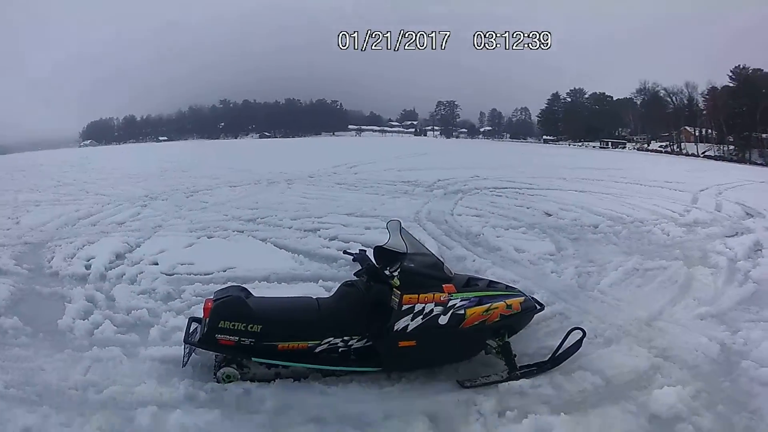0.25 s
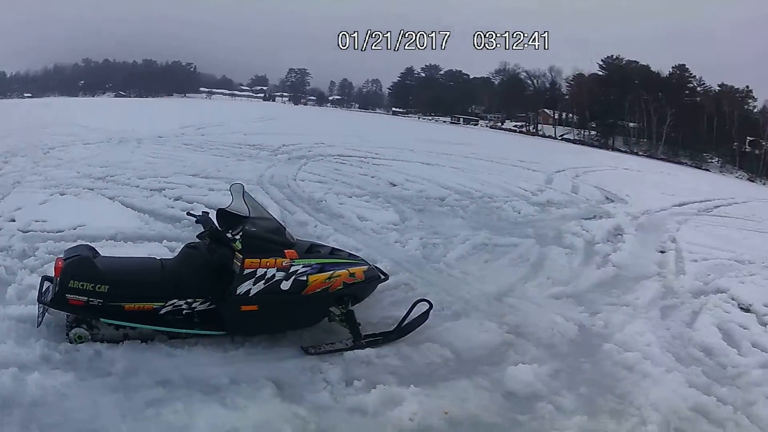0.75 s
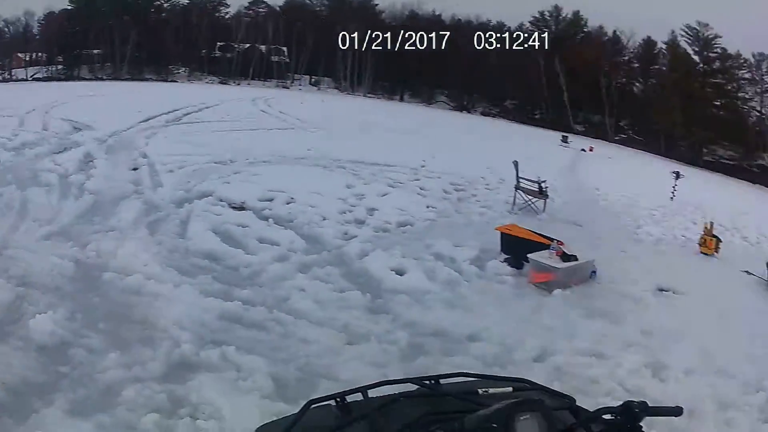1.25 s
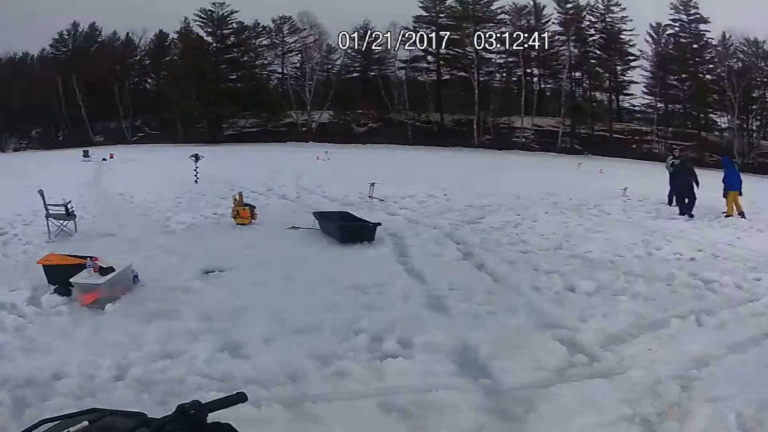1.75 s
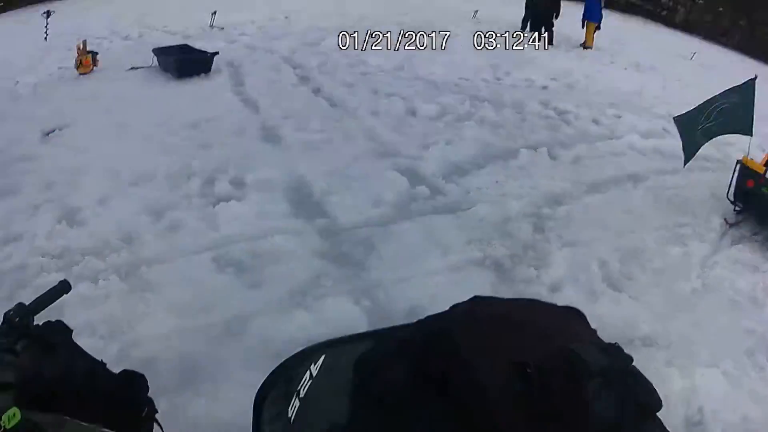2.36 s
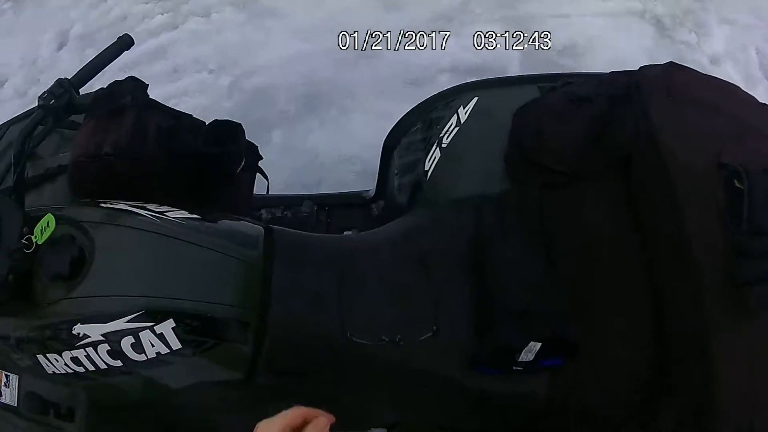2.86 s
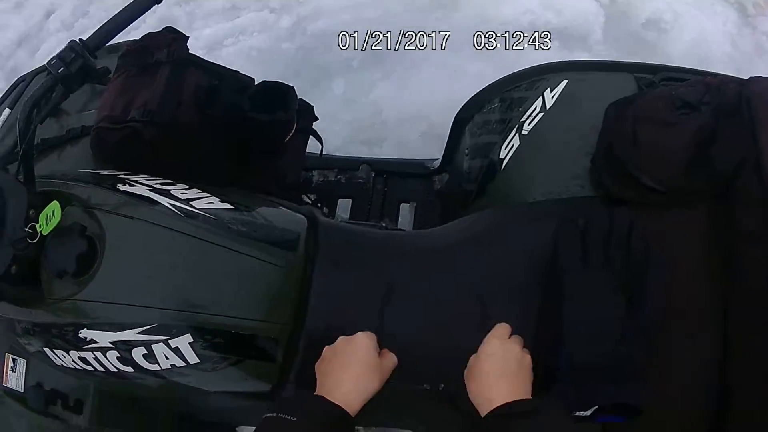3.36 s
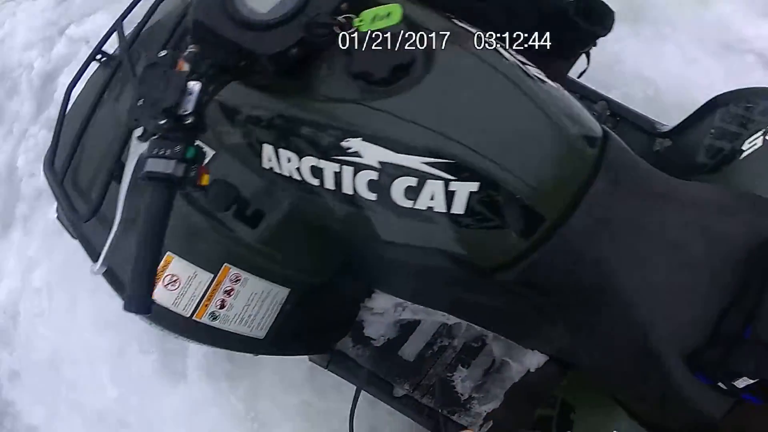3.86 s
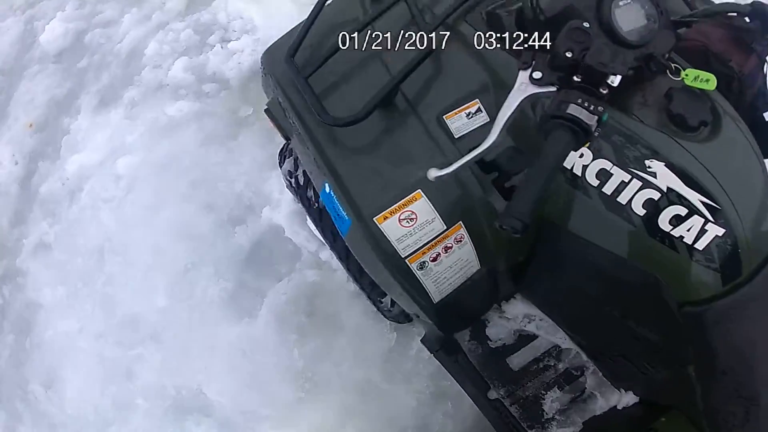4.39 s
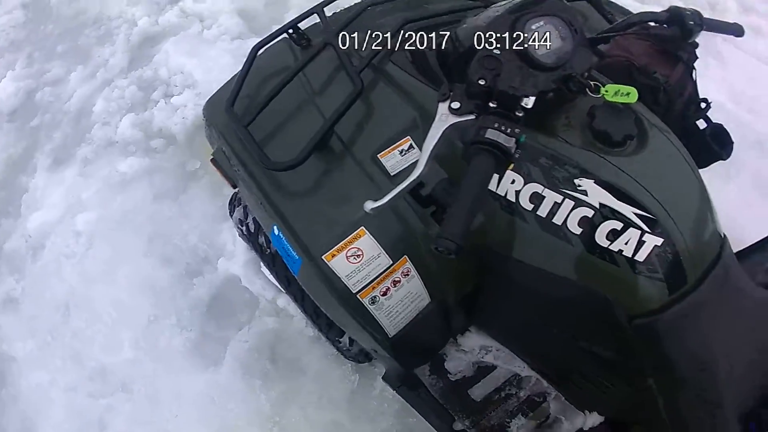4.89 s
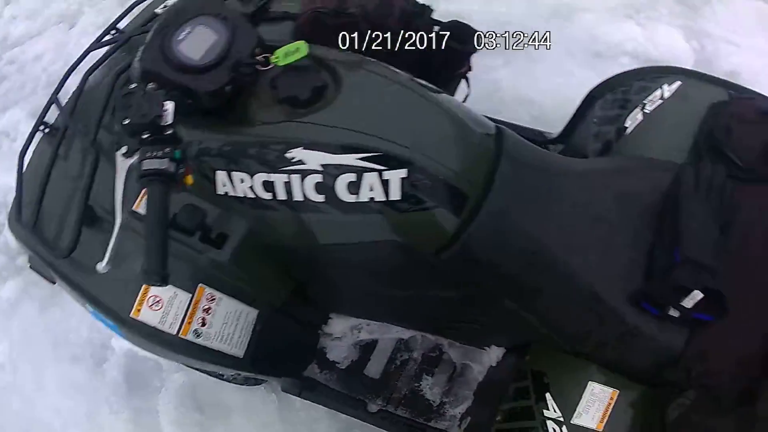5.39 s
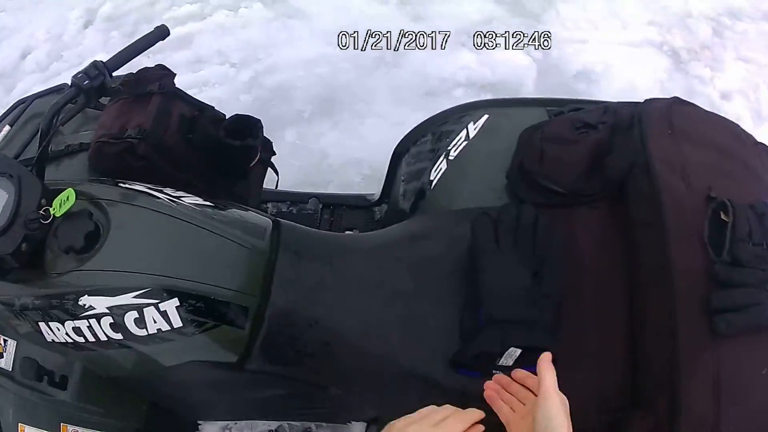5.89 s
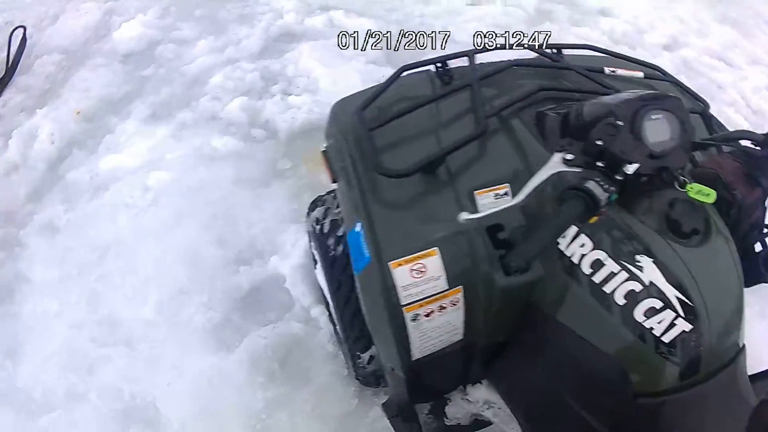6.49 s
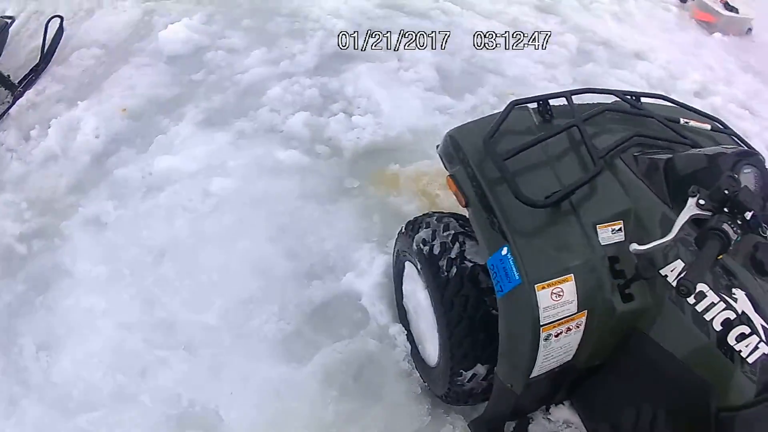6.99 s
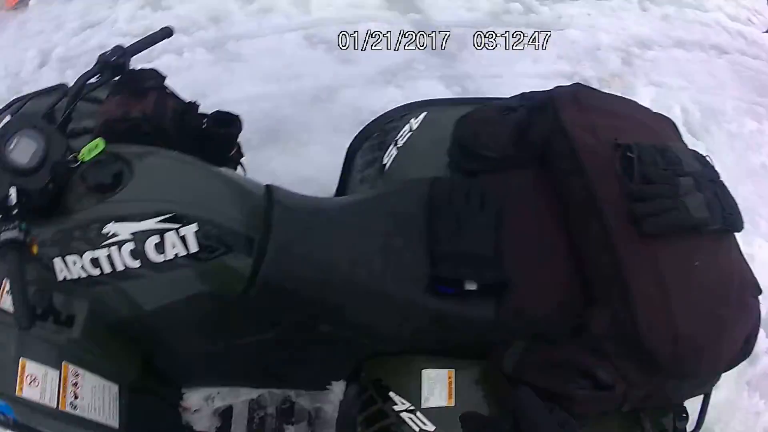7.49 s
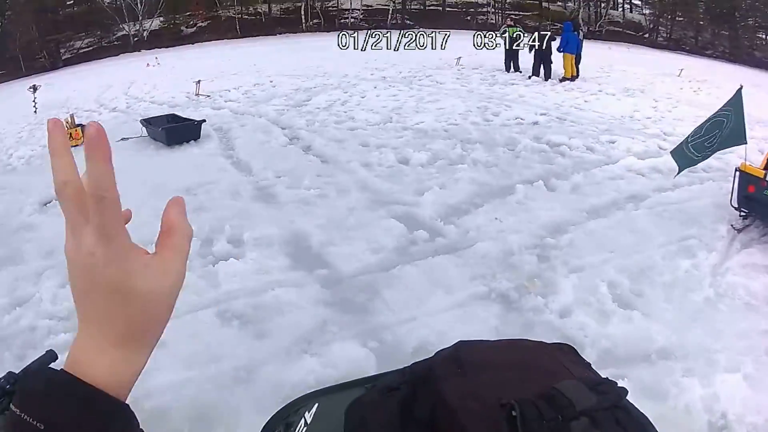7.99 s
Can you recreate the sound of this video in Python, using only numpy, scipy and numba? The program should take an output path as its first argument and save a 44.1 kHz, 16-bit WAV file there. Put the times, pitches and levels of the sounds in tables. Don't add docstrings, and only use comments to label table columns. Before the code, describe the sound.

A small two-stroke engine idles close by on open lake ice. Its firing is ragged: dull hollow exhaust bangs and sharp piston raps skip along over constant rattle and a wavering hum. The microphone is worn on the body in a sealed case, so the top is muffled. Turning the head makes the rattle brighter or duller, and low thuds of steps and jolts come through the body.

```python
import sys
import numpy as np
from scipy import signal
from scipy.fft import rfft, irfft
from scipy.io import wavfile
from scipy.ndimage import uniform_filter1d
from numba import njit

SR = 44100
rng = np.random.default_rng(int(sys.argv[2]) if len(sys.argv) > 2 else 0)


def ratio_of_db(decibels):
    return 10 ** (np.asarray(decibels, float) / 20)


def pcm_store(signal):
    levels = np.round(np.clip(np.atleast_2d(signal), -1, 1) * 32767)
    wavfile.write(sys.argv[1], SR, levels.astype(np.int16).T)


N = 363825
TIME = np.arange(N) / SR
CRANK_HZ = 46.5
BANG_LEAD_TURNS = 0.14


def level(x, db):
    return x * ratio_of_db(db) / np.sqrt(np.mean(x ** 2))


@njit
def svf(x, hz, width):
    y, band, low = np.empty(len(x)), 0., 0.
    for i in range(len(x)):
        g, k = np.tan(np.pi * hz[i] / SR), width / hz[i]
        v = (band + g * (x[i] - low)) / (1 + g * (g + k))
        band, low, y[i] = 2 * v - band, low + 2 * g * v, k * v
    return y


def ring(x, hz, width):
    hz = hz + np.zeros(N)
    once = svf(x + 1e-18, hz, 1. * width)
    return svf(once, hz, 1. * width)


def body(x, modes):
    return sum((-1) ** k * ratio_of_db(db) * ring(x, hz, w) for k, (hz, w, db) in enumerate(modes))


def coloured(points):
    hz, db = np.transpose(points)
    log_f = np.log(np.arange(N // 2 + 1) * SR / N + 1)
    gain = ratio_of_db(np.interp(log_f, np.log(hz), db, left=-70, right=-90))
    return level(irfft(rfft(rng.standard_normal(N)) * gain, N), 0)


def walk(rate):
    k = int(SR / rate)
    held = np.repeat(rng.standard_normal(N // k + 1), k)
    return 1.5 * uniform_filter1d(uniform_filter1d(held, k), k)[:N]


def clicks(s, db):
    x = np.zeros(N)
    np.add.at(x, np.clip(s * SR, 0, N - 1).astype(int), ratio_of_db(db))
    return x


def puffs(s, db, rise, fall):
    t = np.arange(SR // 8) / SR
    shape = (1 - np.exp(-t / rise)) * np.exp(-t / fall)
    return signal.fftconvolve(clicks(s, db), shape / shape.max())[:N]


def turbulent(x, span=0.013):
    power = uniform_filter1d(x ** 2, int(span * SR))
    return x / np.sqrt(power + 0.0077 * np.mean(x ** 2))


def spit(gas):
    return turbulent(ring(gas, 4700, 180) + ratio_of_db(-4.5) * ring(gas, 4000, 570))


# (f/Hz, level/dB per Hz)
RUMBLE_COLOUR = [(15, 2.5), (30, -2), (62, -4.5), (76, -2.5), (102, 4.5), (130, -4), (200, -11), (280, -15),
                 (400, -39)]


def rumble():
    return level(coloured(RUMBLE_COLOUR) * ratio_of_db(0.5 * walk(1.4)), -71.0)


# (t/s, peak level/dB, f/Hz, time to fade by 60 dB/s)
BODY_THUDS = [(0.06, -50.5, 60.5, 0.97), (0.251, -43.5, 63.6, 0.68), (0.729, -51.5, 64.4, 0.46),
              (1.239, -42, 63.7, 0.47), (1.403, -45.5, 60.5, 0.28), (1.638, -51, 60.6, 0.84),
              (1.78, -55, 61, 0.15), (1.93, -51, 32.5, 0.21), (2.1, -54, 57.3, 0.83),
              (2.361, -57, 57, 0.54), (3.551, -51.5, 45, 0.29), (4.954, -43.5, 54.5, 0.34),
              (5.007, -37, 62, 0.37), (5.281, -55, 70, 0.5), (6.55, -53, 40.3, 0.3), (7.45, -59, 31, 0.25)]


def thuds():
    out = np.zeros(N)
    wobble, sway = ratio_of_db(1.3 * walk(22)), 0.5 * walk(24)
    knock = ring(ring(rng.standard_normal(N), 140, 180), 140, 260)
    knock = turbulent(knock, 0.045)
    for s, db, hz, t60 in BODY_THUDS:
        t = np.maximum(TIME - s, 0)
        fade = np.exp(-np.log(1000) * t / t60) * (1 - np.exp(-t / 0.012))
        tap_fade = np.exp(-t / 0.023) * (1 - np.exp(-t / 0.0052))
        tap = ratio_of_db(-14 + 0.4 * (db + 41.5)) * knock * tap_fade
        out += ratio_of_db(db) * (fade * np.sin(2 * np.pi * hz * t + sway) + tap)
    return out * wobble


def crank():
    s = np.array(PISTON_RAPS)[:, 0]
    turns = np.cumsum(np.round(np.diff(s, prepend=s[0]) * CRANK_HZ))
    lead = np.interp(TIME, s, turns - CRANK_HZ * s)
    return CRANK_HZ * TIME + uniform_filter1d(lead, SR // 5, mode="nearest")


def lit(marks, turns, lead=0):
    s, db, count, trait = np.transpose(marks)
    at = np.round(np.interp(s, TIME, turns) + lead)
    charge = np.cumsum(count) - count
    each = np.arange(charge[-1] + 1)
    turn = np.round(np.interp(each, charge, at) + 1e-6)
    between = ~np.isin(each, charge)
    when = np.where(between, np.interp(turn - lead, turns, TIME), np.interp(each, charge, s))
    each_trait = np.repeat(trait, count.astype(int))[:len(each)]
    return when, np.interp(each, charge, db), each_trait, between


def shaking(turns):
    rap_s = lit(PISTON_RAPS, turns)[0]
    bang_s = lit(EXHAUST_BANGS, turns, BANG_LEAD_TURNS)[0]
    jolts = puffs(rap_s, 0, 0.00063, 0.0049)
    jolts = jolts + 0.16 * puffs(bang_s - 0.012, 0, 0.00048, 0.065)
    stir = 0.33 + jolts
    return stir / np.mean(stir)


# (multiple of the crank rate, rms level/dB)
PUMP_TONES = [(3, -82), (4, -90), (5, -92), (6, -82), (9, -75), (10, -69), (11, -64), (12, -65), (13, -63),
              (15, -70), (16, -71), (17, -66), (18, -72), (19, -65), (24, -72)]


def pumping(turns, lower_db):
    tones = np.zeros(N)
    for k, db in PUMP_TONES:
        strength = ratio_of_db(db + 1.5 * walk(10))
        angle = 2 * np.pi * k * (turns + 0.37 * (k > 14))
        tones += strength * np.cos(angle + 0.3 * walk(6))
    return tones * ratio_of_db(3.0 + 0.058 * (lower_db + 53.0))


# (f/Hz, width/Hz, level/dB)
BLAST_RINGS = [
    (1213, 64, -3),
    (1711, 60, -4),
    (1970, 350, -18),
    (2890, 290, -16.5),
    (3690, 97, -28.5),
    (4130, 100, -31),
]


def pipe_blast(gas, tip_db, count=6):
    return body(gas, BLAST_RINGS[:count]) + ratio_of_db(tip_db) * ring(gas, 1507, 91)


# (f/Hz, level/dB per Hz)
CLATTER_COLOUR = [(240, -38.5), (400, -9), (480, -8.5), (590, -7), (650, -13), (880, -5.5), (1040, -17.5),
                  (1230, -12.5), (1900, -15.5), (2540, -21), (2850, -17.5), (3700, -31.5), (4800, -42.5),
                  (5800, -47.5)]


def clatter(turns, hz, treble_db, upper_db, lower_db, tip_db):
    throb = np.sqrt(shaking(turns)) * ratio_of_db(0.27 * np.cos(4 * np.pi * turns) + 0.52 * walk(25))
    noise = rfft(coloured(CLATTER_COLOUR) * throb)
    f = np.arange(len(noise)) * SR / N
    edges = ((0, 1040), (1040, 2540), (2540, SR))
    low, mid, top = (level(irfft(noise * ((f >= a) & (f < b)), N), 0) for a, b in edges)
    gas = rng.standard_normal((2, N))
    upper = level(pipe_blast(gas[0], tip_db, 2) * throb, 0)
    ear = level(ring(gas[1], hz, 180) * throb ** 1.1, 0)
    heard = ratio_of_db(lower_db - 4.0) * low
    heard = heard + ratio_of_db(upper_db) * (upper + 1.13 * mid)
    heard = heard + ratio_of_db(treble_db - 6.5) * ear
    return heard + ratio_of_db(-64.5 + 0.067 * (treble_db + 55.0)) * top


# (t/s, peak level/dB, lit charges until the next row, level those fall short or over/dB)
PISTON_RAPS = [(0.0364, -43.1, 3, 1), (0.2328, -42.4, 2, 2), (0.3195, -43.0, 1, 0), (0.4947, -44.2, 4, 2),
               (0.8216, -40.6, 3, 0), (0.9965, -35.9, 3, 0), (1.2572, -33.4, 9, -6), (1.8166, -34.0, 6, -1),
               (2.2937, -36.3, 3, -5), (2.838, -40.6, 3, 2), (2.9677, -43.9, 5, 2), (3.3989, -41.4, 6, 0),
               (3.7633, -32.9, 6, -3), (4.2563, -32.4, 2, -5), (4.3413, -34.1, 2, 2),
               (4.4696, -33.1, 3, -1), (4.7053, -31.9, 3, -2), (4.8344, -33.1, 2, -8),
               (5.1807, -32.5, 2, 4), (5.3108, -37.7, 4, 1), (5.7648, -44.5, 6, 3), (6.2149, -34.9, 2, 0),
               (6.3412, -32.9, 5, -2), (6.7242, -36.1, 3, 1), (6.9788, -33.9, 1, 0), (7.0843, -34.8, 4, -2),
               (7.2552, -31.3, 2, -3), (7.383, -38.4, 2, -2), (7.5525, -42.8, 8, 0), (8.1243, -32.6, 1, 0)]


def raps(turns, hz, treble_db, tip_db):
    s, db, short_db, between = lit(PISTON_RAPS, turns)
    chance = rng.standard_normal((len(s), 2)).T
    db = db + between * (short_db + 1.2 * chance[0])
    after_db = -8 + 1.5 * chance[1]

    whole = np.flatnonzero(np.diff(np.floor(turns))) / SR
    soft_db = np.interp(whole, TIME, treble_db) + 5 + 2.8 * rng.standard_normal(len(whole))
    soft_db = soft_db + 10 * np.log10(np.interp(whole - 0.004, TIME, shaking(turns)))
    far = np.abs(whole[:, None] - s).min(axis=1) > 0.006

    lag, width = 0.0026, 200
    kick = clicks(s - lag, db + 1) + clicks(whole[far] - lag, soft_db[far])
    kick = kick * SR * np.e / (2 * np.pi * width)
    kick = ring(kick, hz, 1200)
    twin = ratio_of_db(-11 + 0.05 * (hz - 2100) - 2.2 * (treble_db + 51.5))
    slap = ring(kick, hz, width) + twin * ring(kick, 2380, 150) + ratio_of_db(-16) * ring(kick, 2800, 370)

    gas = rng.standard_normal((3, N))
    hood = turbulent(ring(gas[0], hz, 90) + twin * ring(gas[0], 2380, 140))
    hood = hood + ratio_of_db(-11.5) * level(pipe_blast(gas[1], tip_db), 0)
    echo = puffs(s + 0.006, db + after_db - 5.5, 0.003, 0.012) * hood
    return slap + echo + puffs(s - 0.001, db - 46.5, 0.00065, 0.0024) * spit(gas[2])


# (f/Hz, width/Hz, level/dB)
BARK_RINGS = [
    (516, 210, -12.5),
    (710, 38, 6),
    (778, 38, 0.5),
    (889.5, 16, 0.5),
]
# (t/s, boom level/dB, lit charges until the next row, their bark level over the boom/dB)
EXHAUST_BANGS = [(0.0777, -45.9, 4, -4.7), (0.3822, -50, 1, -3.5), (0.4043, -48.2, 4, -4.0),
                 (0.6886, -48.1, 4, 0.4), (1.0144, -49.6, 5, 2.4), (1.4704, -49.5, 4, 5.2),
                 (1.7703, -51.0, 6, 4.7), (2.2693, -52.2, 3, 1.9), (2.4667, -55.2, 6, 7.4),
                 (2.9639, -55.0, 1, 4.3), (3.0288, -53.4, 5, 5.0), (3.3747, -55.8, 4, 1.5),
                 (3.5458, -53.5, 5, 4.2), (4.0177, -49.7, 4, -2.0), (4.1892, -47.5, 4, -1.2),
                 (4.5094, -48.3, 4, 0.8), (4.724, -47.4, 5, 0.9), (5.134, -48.6, 4, -0.0),
                 (5.394, -52.1, 3, 6.6), (5.632, -56.5, 1, 2.5), (5.6536, -55.4, 2, 8.6),
                 (5.8482, -56.7, 6, 5.6), (6.2329, -48.8, 5, 2.1), (6.6377, -53.1, 2, 3.6),
                 (6.7222, -52.1, 5, 6.5), (7.0605, -55, 4, 6.8), (7.3373, -50.6, 4, 3.5),
                 (7.6757, -51.7, 3, 0.8), (7.8027, -53.1, 5, 4.0), (8.2067, -54.2, 1, 5.8)]


def bangs(turns, hz, lower_db, tip_db):
    s, db, bark_db, between = lit(EXHAUST_BANGS, turns, BANG_LEAD_TURNS)
    chance = rng.standard_normal((len(s), 4)).T
    bark_db = bark_db - 0.1 + 1.5 * chance[1]
    head_db = 1.3 * (np.interp(s, TIME, lower_db) + 52.5)
    blast_db = 3.5 - 1.0 * (db + 52.5) + head_db + 1.5 * chance[2]
    db = db + between * (-0.8 + 1.45 * chance[0])

    order = 8
    swell = uniform_filter1d(puffs(s - 0.012, db + 0.092, 0.023, 0.009), SR // 80)
    swell = swell + ratio_of_db(-65 + 1.4 * (lower_db + 47.5))
    tone = np.cos(2 * np.pi * order * turns + 0.43 * walk(12))
    boom = swell * (tone + ratio_of_db(-10.0) * np.cos(2 * np.pi * (order - 1) * turns))

    gas = rng.standard_normal((3, N))
    blow = clicks(s - 0.009, db + bark_db + 22.5) + clicks(s - 0.002, db + bark_db + 24.0)
    open_side = ratio_of_db(1.8 * (lower_db + 49.0))
    bark = open_side * body(blow, BARK_RINGS[:3]) - body(blow, BARK_RINGS[3:])
    bark_puffs = puffs(s - 0.012, db + bark_db - 4.5, 0.0089, 0.012)
    bark = bark + bark_puffs * turbulent(body(gas[0], BARK_RINGS))

    jet = pipe_blast(gas[1], tip_db) + ratio_of_db(0.5) * ring(gas[1], hz, 200)
    blast = puffs(s - 0.011, db + blast_db - 2.5, 0.0062, 0.016) * turbulent(jet)
    spit_puffs = puffs(s - 0.007, db - 23 + 3.5 * chance[3], 0.0014, 0.0053)
    return boom + bark + blast + spit_puffs * spit(gas[2])


# (t/s, ear-side resonance f/Hz, facing the engine level/dB, turned to the exhaust level/dB, nod 0 up - 1 down)
HEAD_TURNS = [(0, 2164, -1.5, -2, -0.14), (0.498, 2136, -3, -4, -.3), (1.001, 2150, 4.5, -5, .2),
              (1.3, 2080, 3, 4.5, 0.34), (1.6, 2175, -2, 4.5, -0.26), (2.279, 2276, 3.5, 0.5, .1),
              (2.361, 2132, -3.5, 1.5, .9), (3.4, 2083, -3.5, -1.5, .9), (3.649, 2127, 5, 1, 0.88),
              (4.1, 2090, 3.5, -2.5, 0.64), (4.6, 2106, 6, 2, 1.2), (5.249, 2101, 7.5, -2, .9),
              (5.45, 2100, 1.5, -1.5, 1), (5.85, 2130, -3.5, 0.5, 1.3), (6.05, 2110, 6.5, -2.5, 1.2),
              (7.299, 2097, 3, 1.5, .8), (7.42, 2138, -3, 2.5, .9), (7.9, 2208, -2.5, 3, .7)]


def scene():
    s, *columns = np.transpose(HEAD_TURNS)
    hz, facing_db, side_db, nod = (np.interp(TIME, s, c) for c in columns)
    treble_db, tip_db = -51.5 + facing_db, -8 + 11 * nod
    upper_db = -57.0 + 0.15 * facing_db + 0.79 * side_db - 1.5 * nod
    lower_db = -51.5 + 0.44 * facing_db + 0.27 * side_db
    turns = crank()
    engine = pumping(turns, lower_db)
    engine = engine + clatter(turns, hz, treble_db, upper_db, lower_db, tip_db)
    engine = engine + raps(turns, hz, treble_db, tip_db)
    engine = engine + bangs(turns, hz, lower_db, tip_db)
    return (rumble() + thuds() + engine)[None]


# (f/Hz, level/dB per Hz)
HISS_COLOUR = [(4000, -26), (5900, -14), (6700, -6.5), (8000, -16), (9200, -3), (11500, 3), (15500, -2),
               (20000, -19)]


def converter_hiss():
    return ratio_of_db(-87) * coloured(HISS_COLOUR)


def band_limit(x):
    return signal.sosfilt(signal.butter(12, 15720, fs=SR, output="sos"), x)


def record(dry):
    case = signal.cheby1(6, 0.5, 5030, fs=SR, output="sos")
    muffled = signal.sosfilt(case, dry)
    return band_limit(muffled + converter_hiss())


dry = scene()
out = record(dry)
pcm_store(out)
```